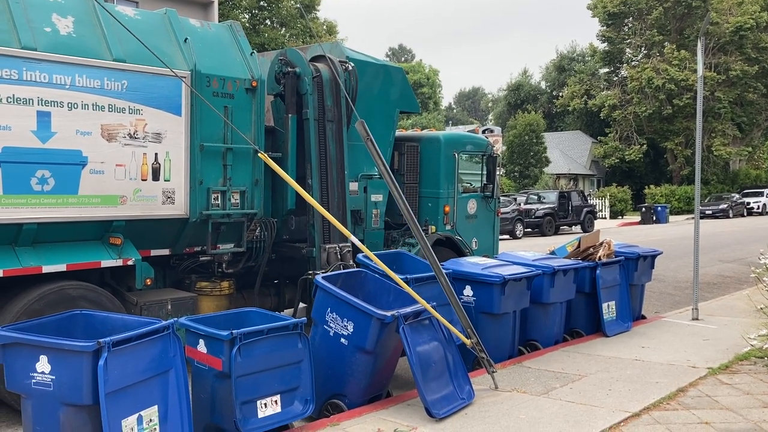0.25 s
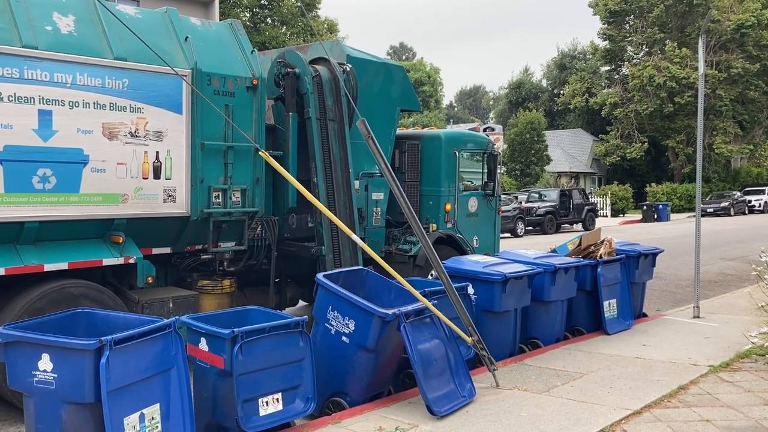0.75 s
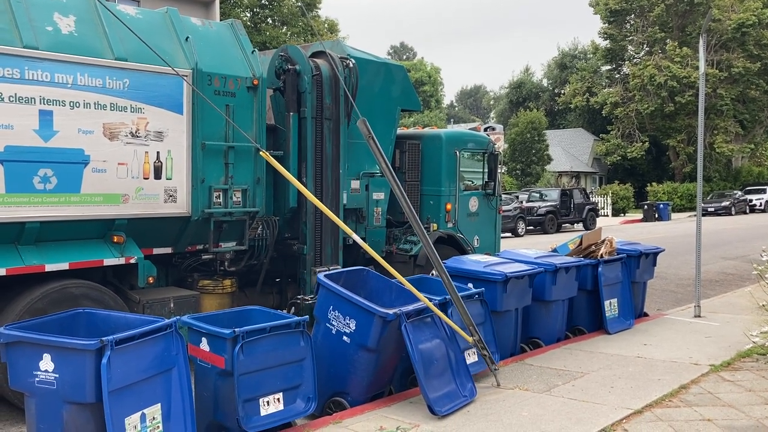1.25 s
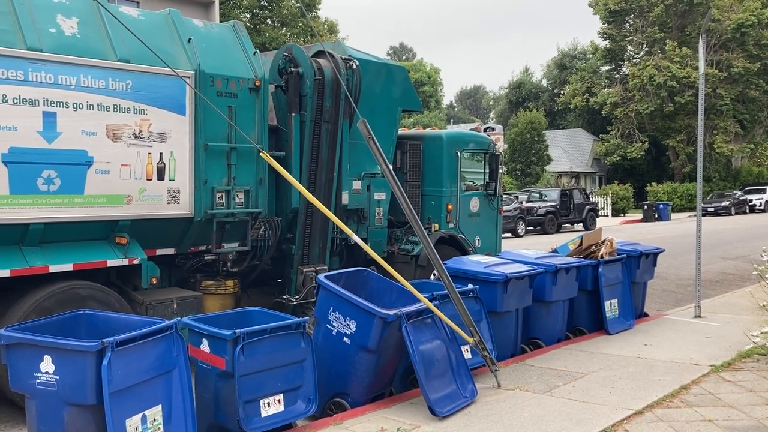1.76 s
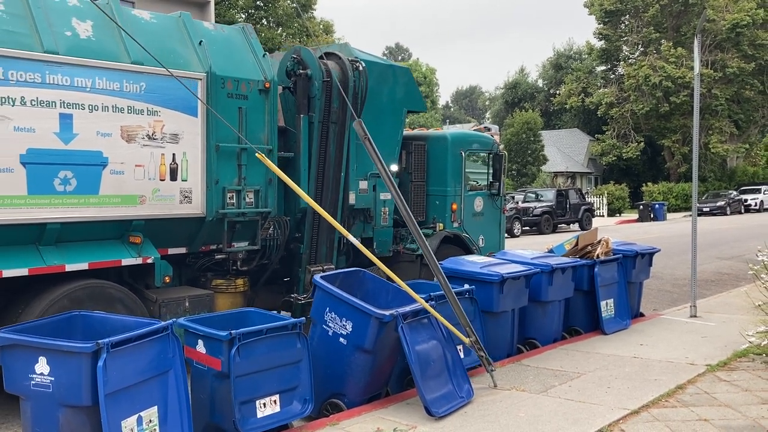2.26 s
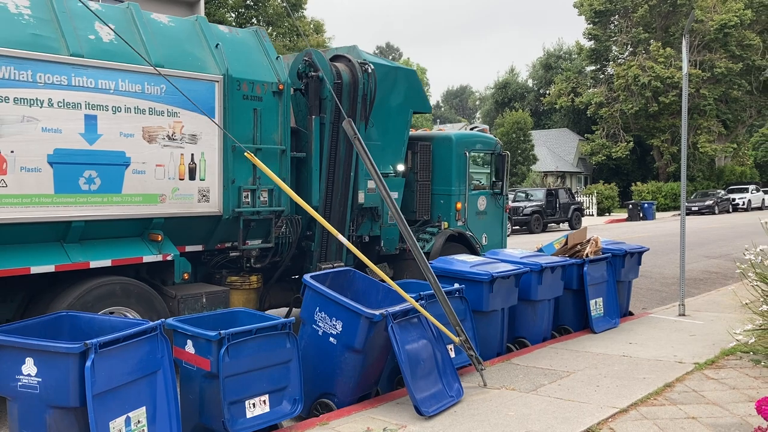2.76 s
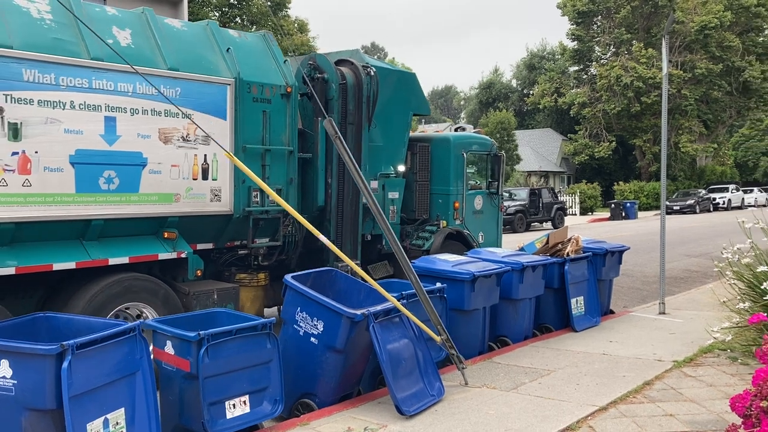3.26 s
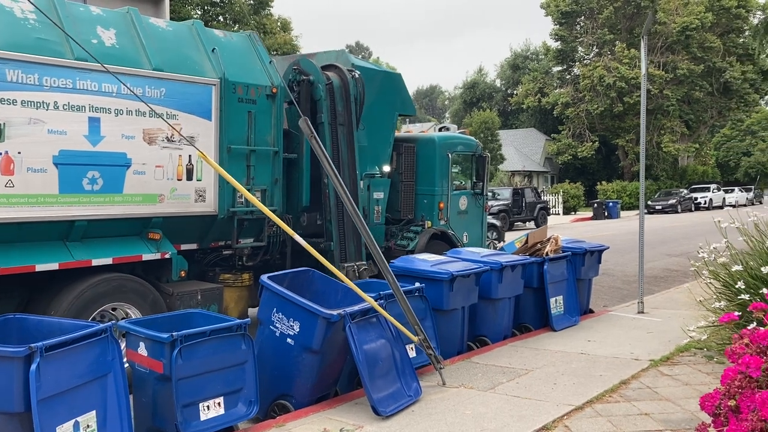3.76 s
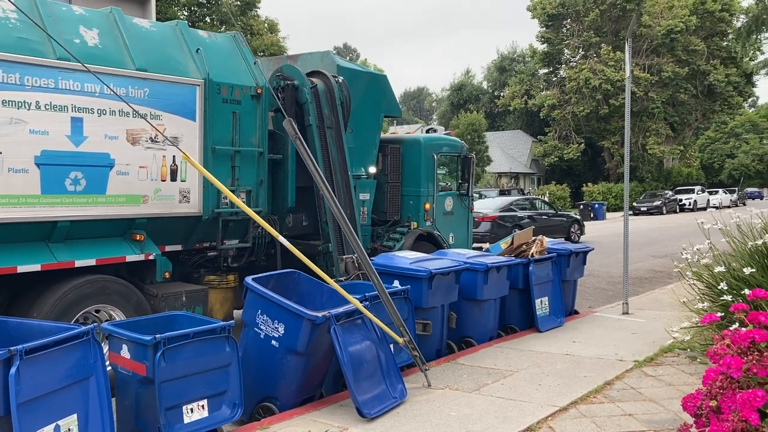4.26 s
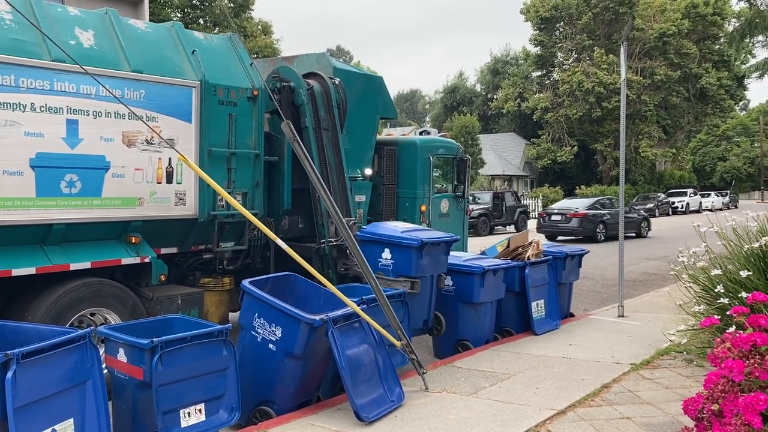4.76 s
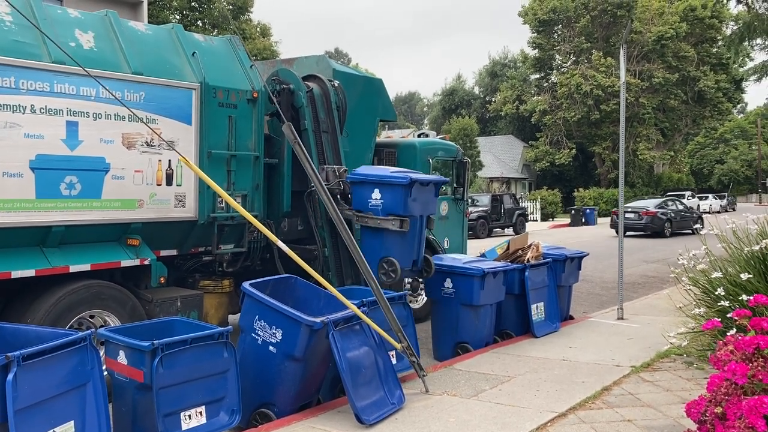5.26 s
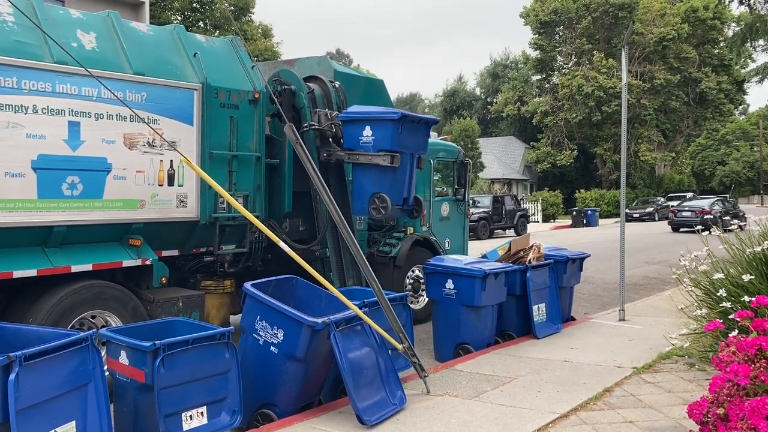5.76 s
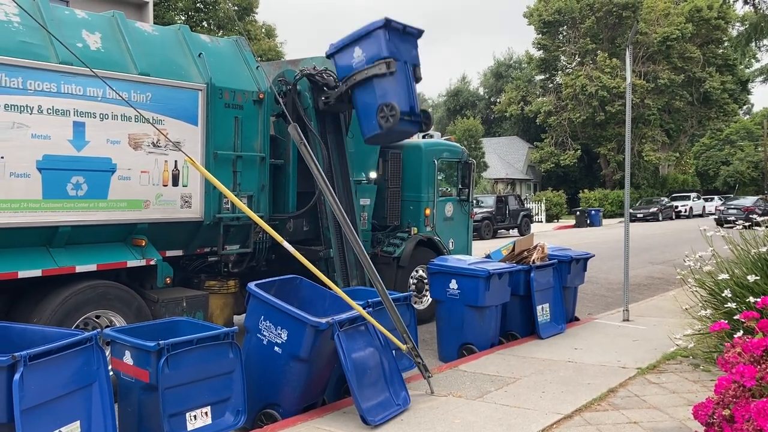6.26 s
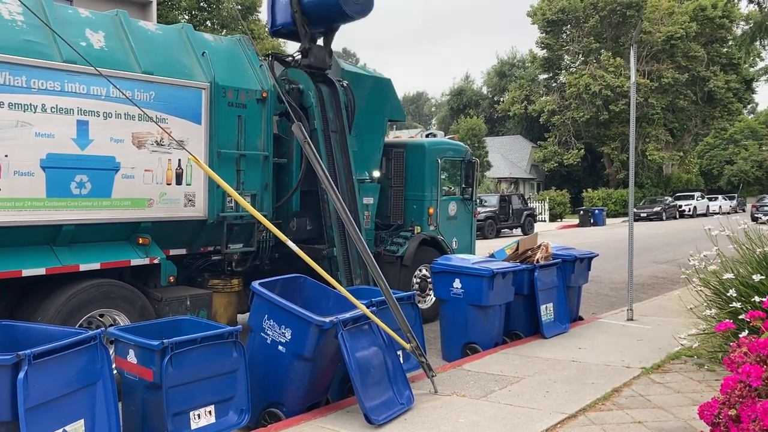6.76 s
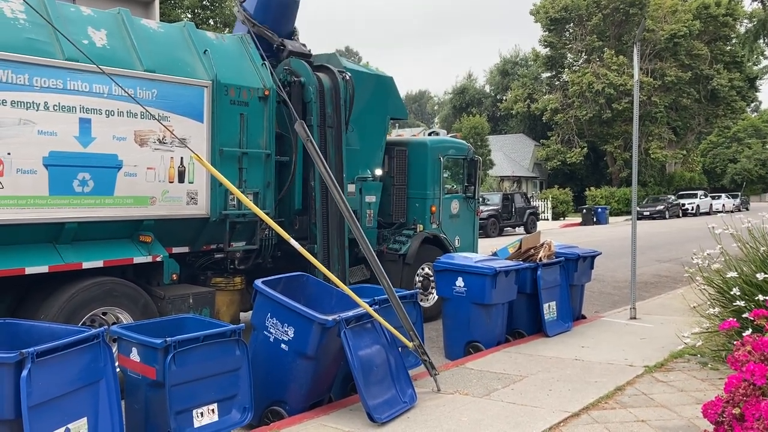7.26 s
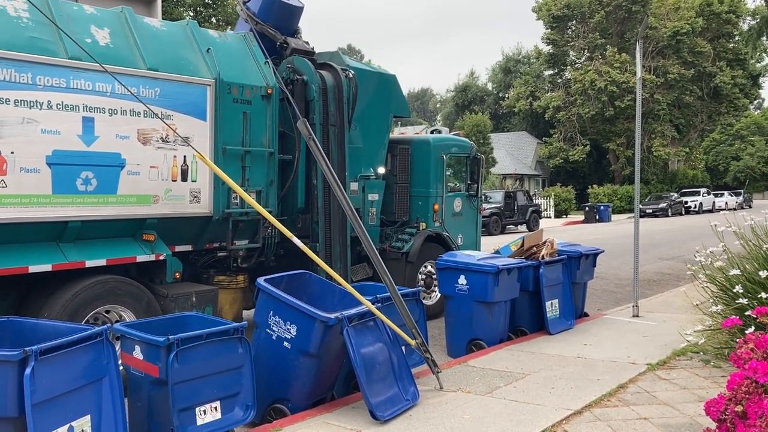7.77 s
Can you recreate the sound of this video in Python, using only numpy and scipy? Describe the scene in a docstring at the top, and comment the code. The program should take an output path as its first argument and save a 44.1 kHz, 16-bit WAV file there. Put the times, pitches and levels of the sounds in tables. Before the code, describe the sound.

A refuse truck's diesel slows to idle, then revs as its hydraulic arm lifts a plastic cart, amid clanks, thuds and brake squeals.

```python
"""At a kerb between houses, a side-loading refuse truck idles down, then revs to lift a plastic cart.
Its diesel fires in uneven puffs that boom through the exhaust; the pump whines and the turbo whistles.
Brakes squeal, air valves hiss, the steel arm clanks, hollow plastic thuds and recyclables tumble.
House fronts send back a short echo, and two microphones a little apart hear the street."""
import sys
import numpy as np
from scipy import signal
from scipy.fft import rfft, irfft, next_fast_len
from scipy.io import wavfile
from scipy.ndimage import uniform_filter1d, minimum_filter1d, map_coordinates

SR = 44100
rng = np.random.default_rng(int(sys.argv[2]) if len(sys.argv) > 2 else 0)


def file_out(sig):
    """Save sig as 16-bit WAV at sys.argv[1]."""
    # one column per channel
    cols = np.atleast_2d(sig).T
    # limit, then scale
    lim = np.clip(cols, -1, 1)
    pcm = np.round(lim * 32767).astype(np.int16)
    wavfile.write(sys.argv[1], SR, pcm)


N = 353682
T = np.arange(N) / SR

# strength of the echo against the direct sound: (frequency [Hz], level [dB])
ECHO_LEVEL = [(60, -24.5), (250, -12.5), (450, -7), (900, -0.5), (2500, -6), (6000, -5.5), (8000, -17),
              (12000, -14)]


def amp(db):
    """Turn decibels into a gain."""
    return 10 ** (np.asarray(db) / 20)


def unit(x):
    """Scale a signal to an average (rms) level of 1."""
    return x / np.sqrt(np.mean(x ** 2) + 1e-20)


def along(points, hz):
    """Read between (frequency, value) points on a log frequency axis."""
    f, v = np.transpose(points)
    return np.interp(np.log(hz + 1), np.log(f + 1), v)


def curves(rows):
    """Turn (time, values...) rows into one curve per value."""
    times, *columns = np.transpose(rows)
    return [np.interp(T, times, column) for column in columns]


def wobble(rate):
    """A smooth random curve through `rate` points a second."""
    return map_coordinates(rng.standard_normal(int(N * rate / SR) + 4), [T * rate])


def decay(t, fade):
    """Die away by 60 dB in `fade` seconds, as all fade times here do."""
    return amp(-60 * t / fade)


def burst(start, rise, hold, fade):
    """A loudness shape that rises to 1, holds and dies away."""
    return decay(np.clip(T - start - rise - hold, 0, None), fade) * np.clip((T - start) / rise, 0, 1)


def filtered(x, response):
    """Filter x with a gain that depends on frequency."""
    size = next_fast_len(N + SR // 2)
    return irfft(rfft(x, size) * response(np.fft.rfftfreq(size, 1 / SR)), size)[..., :N]


def coloured(x, spectrum):
    """Shape x by (frequency [Hz], level [dB]) points, then scale it to level 1."""
    return unit(filtered(x, lambda hz: amp(along(spectrum, hz))))


def noise(spectrum):
    """Steady noise with the given spectrum."""
    return coloured(rng.standard_normal(N), spectrum)


def tone(hz, drift_hz, flutter_db):
    """A tone of level 1 whose pitch and strength waver."""
    drift = drift_hz * wobble(900)
    return unit(amp(flutter_db * wobble(40)) * np.sin(2 * np.pi * np.cumsum(hz + drift) / SR))


def ticks(hz):
    """The samples at which each cycle of a rate ends."""
    return np.flatnonzero(np.diff(np.floor(np.cumsum(hz) / SR)))


def swells(rows, waver_share, waver_db, rate):
    """Tones that swell and fade, wavering in pitch and strength."""
    out = np.zeros(N)
    pitch, strength = wobble(rate), wobble(rate)
    for start, length, hz, db in rows:
        span = slice(round(start * SR), round((start + length) * SR))
        swell = np.abs(np.sin(np.pi * np.linspace(0, 1, len(T[span])))) ** 0.29
        phase = 2 * np.pi * hz * np.cumsum(1 + waver_share * pitch[span]) / SR
        out[span] += np.sqrt(2) * amp(db + waver_db * strength[span]) * swell * np.sin(phase)
    return out


def mode(t, hz, db, fade, scatter_db, detune):
    """One ringing note (mode) of a struck thing, a little different each time."""
    strength = amp(db + rng.normal(0, scatter_db))
    return strength * decay(t, fade) * np.sin(2 * np.pi * hz * rng.normal(1, detune) * t)


def favoured(hz, near_hz):
    """The spot that is struck lifts the modes close to near_hz by up to 9 dB."""
    return 9 * np.exp(-(np.log2(hz / near_hz) / .3) ** 2)


def street_echo(x, count=4):
    """House fronts return a short tail, different at each microphone and changing as the air moves."""
    # how long the echo lasts: (frequency [Hz], fade time [s])
    fades = [(100, 0.71), (1000, 0.28), (5000, 0.19), (12000, 0.098)]
    hz, t, bands = signal.stft(rng.standard_normal((count, 2, SR // 3)), SR, nperseg=256)
    bands = bands * decay(t, along(fades, hz)[:, None])
    tails = signal.istft(bands / np.linalg.norm(bands, axis=-1, keepdims=True), SR, nperseg=256)[1]
    tails /= np.linalg.norm(tails, axis=-1, keepdims=True)
    delayed = np.pad(tails, ((0, 0), (0, 0), (200, 0)))
    step = (T / .12 - np.arange(count)[:, None]) % count
    parts = x * np.where(step < 2, np.sin(np.pi * step / 2), 0)  # the tails take turns, overlapping
    echo = signal.fftconvolve(parts[:, None], delayed, axes=2).sum(0)[:, :N]
    return filtered(echo, lambda f: amp(along(ECHO_LEVEL, f)))


def turbocharger():
    """Spinning blades whistle, fuzzier as they go faster."""
    # the blades' note: (time [s], pitch [Hz], level [dB])
    blades = [(0, 11500, -36), (.1, 11250, -45), (.3, 10570, -38.5), (.5, 10050, -40), (.7, 9700, -32.5),
              (.9, 8550, -50), (1.4, 7870, -54.5), (2.8, 7420, -52), (4.4, 6987, -57), (4.7, 7530, -50),
              (4.82, 8110, -37), (4.92, 8700, -46), (5.1, 9284, -41), (5.5, 10120, -36), (6, 10680, -36),
              (6.5, 11020, -37.5), (7.3, 10850, -44), (8.02, 11250, -38.5)]
    hz, db = curves(blades)
    whistle = tone(hz, drift_hz=110 + 0.022 * (hz - 6500), flutter_db=2.5)
    return amp(db) * whistle * amp(2.5 * wobble(200) - 2)


def thin_whistle():
    """A thin whistle is heard while the engine works hard."""
    # its course: (time [s], pitch [Hz], level [dB])
    course = [(0, 7330, -60), (.2, 6930, -47), (.5, 6380, -45), (.65, 6150, -72), (5.3, 6361, -77),
              (5.6, 6547, -58), (6.2, 6900, -53), (6.45, 7074, -41), (6.9, 7000, -45), (7.2, 7053, -50),
              (7.5, 7020, -57), (7.7, 7016, -47), (8.02, 7080, -46)]
    hz, db = curves(course)
    return amp(db) * tone(hz, drift_hz=22, flutter_db=2)


def short_squeals():
    """Brakes and joints give brief, clear squeals."""
    # squeals: (start [s], length [s], pitch [Hz], level [dB])
    squeals = [(3.07, .13, 14800, -50), (3.23, 0.13, 9220, -30), (3.22, .074, 15500, -46),
               (3.385, 0.077, 7070, -29.5), (3.46, 0.11, 7080, -49), (3.878, 0.025, 4490, -42),
               (5.655, 0.044, 6610, -43)]
    return swells(squeals, waver_share=.002, waver_db=2.8, rate=60)


def hydraulics():
    """The hydraulic arm and the packer hum."""
    # hums: (start [s], length [s], pitch [Hz], level [dB])
    hums = [(.9, 0.31, 355, -31), (1.75, 0.54, 271, -31.5), (4.45, 0.71, 205.5, -28.5),
            (4.8, 0.32, 314.3, -33.5), (6, 1.2, 231.5, -28), (6, 0.89, 460.7, -36), (7.3, 0.18, 366, -29.5),
            (7.7, 0.34, 243, -38)]
    return swells(hums, waver_share=.02, waver_db=5, rate=28)


def breathy_tones():
    """Breathy high squeaks, and the pump whine's fuzzy octave at idle; fast wavering blurs both."""
    # squeaks, and the octave near 2400 Hz: (start [s], length [s], pitch [Hz], level [dB])
    notes = [(1.0, 0.062, 11050, -29), (2.85, 0.099, 2387, -48), (3.128, 0.032, 11050, -32.5),
             (3.158, 0.041, 11060, -43), (3.62, 0.21, 2375, -49), (4.24, .22, 2445, -43),
             (5.893, 0.022, 11750, -26), (5.915, 0.062, 11900, -42)]
    return swells(notes, waver_share=.012, waver_db=4, rate=700)


def lift_chain(links_hz=51):
    """Chain links tick over their toothed wheel while the arm lifts."""
    lift = amp(-41.5 + 3.52 * wobble(4.87)) * burst(start=4.545, rise=0.24, hold=1.107, fade=0.43)
    at, links = ticks(links_hz * (1 + .22 * wobble(30))), np.zeros(N)
    links[at] = amp(3 * rng.standard_normal(len(at)))
    rattle = signal.fftconvolve(links, decay(T[:SR // 20], 0.026))[:N] * rng.standard_normal(N)
    return lift * coloured(rattle, [(3000, -9), (8000, -6), (13000, -1), (15800, -12)])


def air_valves():
    """Valves let out air in hissing jets."""
    # jets: (start [s], rise [s], hold [s], fade time [s], level [dB])
    vents = [(0.938, 0.056, 0.068, 0.54, -26.5), (3.303, 0.045, 0.071, 0.15, -30.5)]
    # colour of the hiss: (frequency [Hz], level [dB])
    hiss = [(3000, -9), (5000, -13), (7000, -20), (9000, -13), (11000, -5), (13000, -13), (14500, -15)]
    jets = sum(amp(db) * burst(start, rise, hold, fade) for start, rise, hold, fade, db in vents)
    return jets * noise([(1500, -20), *hiss])


def brake():
    """One brake shoe sings on its drum, swelling three times."""
    # the long squeal: (time [s], pitch [Hz], level [dB])
    squeal = [(3.165, 5770, -65), (3.185, 5770, -31), (3.215, 5770, -32), (3.24, 5800, -46),
              (3.34, 5820, -44), (3.414, 5830, -29), (3.448, 5810, -35), (3.5, 5800, -29),
              (3.53, 5800, -42), (3.59, 5800, -49), (3.65, 5800, -75)]
    hz, db = curves(squeal)
    return amp(db) * tone(hz, drift_hz=12, flutter_db=1.2)


def pile(rate, spread_db, fade, spectrum):
    """Small hits of uneven size at random times, about `rate` a second."""
    hits = (rng.random(N) < rate / SR) * amp(spread_db * np.clip(rng.standard_normal(N), -3, 1.6))
    lumps = signal.fftconvolve(hits, decay(T[:SR // 5], fade))[:N]
    return coloured(lumps * rng.standard_normal(N), spectrum)


def tumbling():
    """Recyclables tumble: cardboard and plastic sound dull, cans and glass bright."""
    # slides and cart scrapes: (start [s], rise [s], fade time [s], dull level [dB], bright level [dB])
    slides = [(0.472, 0.012, 0.73, -18, -33), (.707, 0.02, 0.94, -17, -29), (1.1, 0.085, 0.3, -26.5, -35.5),
              (1.34, 0.013, 4.5, -26, -36.5), (1.51, 0.035, 0.46, -35, -27),
              (1.545, 0.048, 0.56, -17.5, -18.5), (1.7, 0.19, 1.3, -26, -39),
              (2.03, 0.057, 0.74, -34, -40.5), (2.929, 0.033, 1.36, -28, -31.5),
              (3.2, 0.015, 0.16, -38, -42), (3.42, 0.092, 0.27, -27, -43), (3.65, 0.22, 1.4, -27, -34),
              (4.206, 0.0092, 0.24, -27, -21), (4.317, 0.02, 0.69, -27, -38),
              (6.508, 0.011, 2.1, -21.5, -32.5), (6.93, 0.035, 1.2, -29, -28.5),
              (7.04, 0.091, 0.25, -21, -29), (7.28, 0.02, 1.4, -22, -32.5)]
    dull = pile(rate=220, spread_db=4, fade=0.078, spectrum=[
        (120, 1), (300, 8), (450, 1.5), (640, 5), (860, -7.5), (1250, -2), (3000, -44)])
    bright = pile(rate=170, spread_db=2.5, fade=0.21, spectrum=[
        (700, -12.5), (1600, 0), (2600, 1), (4500, -5.5), (8000, -11.5), (15800, -18.5)])
    return sum(burst(start, rise, 0, fade) * (amp(dull_db) * dull + amp(bright_db) * bright)
               for start, rise, fade, dull_db, bright_db in slides)


def steel_clanks(dull):
    """Struck steel rings briefly under a spray of dull and bright noise."""
    # blows: (time [s], level [dB], treble [dB], favoured pitch [Hz])
    clanks = [(0.528, -25, -23, 2300), (0.7549, -15, -2, 2600), (0.99, -24.5, -14, 1418),
              (1.352, -34, -25, 1597), (1.409, -27, -21, 1920), (1.537, -15, -1.5, 3750),
              (1.737, -24.5, 1, 3750), (1.7493, -19, 0, 2282), (1.922, -21, -12, 1250),
              (1.94, -21.5, -13, 2000), (1.99, -26, -6.5, 3400), (2.947, -23, -10, 2247),
              (2.951, -26, -20, 1538), (2.9858, -19.5, -10, 1880), (3.067, -25, -18, 2250),
              (3.12, -26, -13, 1404), (3.242, -25, -30, 1598), (3.252, -25, -25, 1800),
              (3.4887, -34, -23, 1090), (3.5328, -34, -25, 1800), (3.691, -31.5, -9, 2320),
              (3.8634, -26, -22, 1710), (3.885, -28, -17, 2400), (3.9523, -30, -15, 2450),
              (4.0901, -35, -1, 2278), (4.2144, -14.5, -5.5, 5090), (4.33, -32, -24, 1189),
              (5.899, -22, -14, 5100), (6.5132, -27, -15, 2305), (6.6607, -22.5, -2.5, 4510),
              (6.9602, -21, 0, 1924), (7.003, -15, -3, 1854), (7.0402, -19, -22, 2297),
              (7.091, -23.5, -7, 2302), (7.283, -22.5, -9, 2500), (7.4537, -19, -6, 4206),
              (7.5453, -27, -4, 4814)]
    # the steel's modes: (pitch [Hz], level [dB], fade time [s])
    steel = [(760, -6, .08), (1180, -6, .07), (1560, -3, .05), (1880, -3, .045), (2250, -2, .05),
             (2860, -6, .06), (3400, -5, .05), (3750, -6, .05), (4500, -11, .04), (5100, -13, .035)]
    out, t = np.zeros(N + SR), T[:SR // 5]
    bright = noise([(4000, 6.5), (7000, 0), (11000, -0.5), (15800, -45)])
    crack = decay(t, .08) + .15 * decay(t, .3)  # a sharp crack, then loose parts settle
    for start, db, treble_db, near_hz in clanks:
        i = round(start * SR)
        tilt_db = 0.13 * treble_db  # duller blows start more softly and ring less in their high modes
        ring = sum(mode(t, hz, level + favoured(hz, near_hz) + tilt_db * np.log2(hz / 1560), fade,
                        scatter_db=2.5, detune=.025) for hz, level, fade in steel)
        spray = amp(tilt_db) * dull[i:][:len(t)] + amp(treble_db + 5) * bright[i:][:len(t)]
        attack = 1 - np.exp(-t * amp(tilt_db) / .0029)
        out[i:][:len(t)] += amp(db) * attack * (.65 * ring + 1.33 * spray * crack)
    return out[:N]


def cart_knocks(dull):
    """A hard knock makes the cart's plastic shell ring, with a slap of dull noise."""
    # knocks: (time [s], level [dB], fade time factor, favoured pitch [Hz])
    knocks = [(0.4754, -13.5, 0.76, 800), (.493, -19.5, 0.73, 415), (.528, -25, .7, 830),
              (0.7084, -19, 1.2, 415), (.719, -15.5, 0.84, 800), (1.565, -16, .8, 650),
              (1.609, -19, 0.7, 650), (1.632, -20, 0.55, 650), (1.846, -21.5, 0.75, 413),
              (2.085, -27, 0.59, 1000), (3.695, -25.5, 0.77, 1000), (3.834, -27, .7, 503),
              (3.878, -21, .7, 620), (3.957, -19.5, .8, 1000), (4.331, -25.5, .8, 620),
              (4.352, -27, .8, 510), (6.672, -19.5, .8, 620), (6.942, -28, 0.59, 1766),
              (7.045, -19, 0.79, 1300), (7.11, -18, .7, 620), (7.1425, -4.5, .15, 1200),
              (7.29, -20, 0.72, 1300), (7.513, -21, .6, 501)]
    # the shell's modes: (pitch [Hz], level [dB], free fade time [s])
    shell = [(415, 0, .09), (520, -5, .07), (650, -3, .07), (830, -3, .07), (1000, -6, .06),
             (1360, -5, .06), (1770, -6, .05), (2000, -8, .04), (2450, -9, .05)]
    out, t = np.zeros(N + SR), T[:SR // 5]
    attack = 1 - np.exp(-t / .0008)
    for start, db, lasting, near_hz in knocks:
        i = round(start * SR)
        ring = sum(mode(t, hz, level + favoured(hz, near_hz), fade * lasting,
                        scatter_db=1.1, detune=0.039) for hz, level, fade in shell)
        slap = 0.65 * decay(t, 0.019) * dull[i:][:len(t)]
        out[i:][:len(t)] += amp(db) * attack * (ring + slap)
    return out[:N]


def hollow_thuds(ring_cycles=39):
    """Hollow carts and the truck's hopper boom in a few low modes; the higher ones die sooner."""
    # thuds: (time [s], level [dB], lowest pitch [Hz])
    thuds = [(.474, -6, 232), (.529, -7.5, 120.5), (.709, -0.5, 148.6), (0.721, -3, 86.4),
             (.776, -11, 106.4), (0.821, -13.5, 90.9), (.875, -8.5, 245), (.915, -5, 127),
             (0.962, -14, 93.6), (1.544, -5, 178.8), (1.568, -8, 98.4), (1.62, -17, 285),
             (1.85, -19, 154.4), (2.959, -8, 248), (3.496, -18, 213.4), (3.715, -10.5, 140.4),
             (3.832, -8, 126.3), (3.88, -13.5, 220.6), (4.088, -10.5, 148.3), (4.218, -17.5, 254.2),
             (6.512, -14, 216), (6.94, -9.5, 239.7), (7.035, -11, 111.3), (7.146, 4.5, 270.8)]
    # the hollow body's modes: (multiple of the lowest pitch, level [dB])
    hollow = [(1, 0), (1.23, -6), (1.8, -8), (2.6, -13), (3.4, -14), (5.2, -18)]
    out, t = np.zeros(N + SR), T[:SR // 3]
    attack = 1 - np.exp(-t / 0.0037)
    for start, db, hz in thuds:
        boom = sum(mode(t, hz * k, level, ring_cycles / (hz * k ** 0.5), scatter_db=0.9, detune=0.018)
                   for k, level in hollow)
        out[round(start * SR):][:len(t)] += amp(db) * attack * np.sqrt(.5) * boom
    return out[:N]


def pump(firing_hz, idling):
    """The pump's gear teeth whine in step with the engine, blurred at idle."""
    # the whine, louder under pressure: (time [s], level [dB])
    whine = [(0, -49), (.3, -45), (.44, -40), (.7, -58), (2.15, -60), (2.35, -49), (2.9, -49), (3.1, -54),
             (3.95, -54), (4.15, -49), (4.45, -56), (4.6, -47), (4.7, -52), (4.8, -40), (4.98, -41),
             (5.07, -46), (5.17, -41), (5.28, -50), (5.42, -39), (5.78, -39), (5.86, -44), (6.03, -36),
             (6.11, -47), (6.27, -38), (6.5, -45), (6.68, -38), (6.9, -38), (7.1, -41), (7.5, -42),
             (7.75, -42), (7.86, -53), (8.02, -40)]
    return amp(curves(whine)[0]) * tone(32.3 * firing_hz, drift_hz=7 + 18 * idling, flutter_db=2.2)


def exhaust_puffs(firing_hz):
    """Each firing sends a puff that echoes along the exhaust pipe."""
    # the six uneven cylinders: (level [dB])
    cylinders = [0, -5, -2.5, -1, -9, -1]
    at, puffs = ticks(firing_hz), np.zeros(N)
    puffs[at] = amp(np.resize(cylinders, len(at)) + 0.37 * rng.standard_normal(len(at)))
    puffs[at] -= 0.86 * puffs[at].mean()  # the silencer cancels most of what all cylinders share
    pipe_echo = decay(T[:SR // 5], 0.21) * rng.standard_normal(SR // 5)
    return unit(signal.fftconvolve(puffs / np.sqrt(firing_hz), pipe_echo)[:N])


def diesel(firing_hz, load_db, idling):
    """The firings make deep tones, pulsing noise and hiss. Returns (tones, noise)."""
    # how the pipe boosts the deep tones: (frequency [Hz], gain [dB])
    pipe = [(30, -32), (38, -18.5), (46, -12.5), (60, -1), (70, 1), (80, -14), (92, -20), (125, -46)]
    # colours of the exhaust, engine body, hiss and topmost sizzle: (frequency [Hz], level [dB])
    exhaust_colour = [(25, -57), (45, -2.5), (85, -1), (150, -5.5), (215, -4.5), (330, -12), (600, -66),
                      (1200, -55)]
    body_colour = [(100, -3), (300, 0), (600, 0), (1000, -5.5), (1600, -8.5), (2500, -11.5), (4000, -15),
                   (6500, -22.5), (9000, -60)]
    hiss_colour = [(3000, -10), (6000, -2), (8500, 0), (11000, -4), (12500, -18), (15800, -36)]
    sizzle_colour = [(9500, -7.5), (12000, -3.5), (13500, -13), (15800, -14)]

    def gain(db, per_hz, per_load, waver_db, rate):
        """A wavering gain that grows with speed and load; db holds at 60 Hz and a load of -14 dB."""
        return amp(db + per_hz * (firing_hz - 60) + per_load * (load_db + 14) + waver_db * wobble(rate))

    phase = 2 * np.pi * np.cumsum(firing_hz) / SR
    surge = idling * np.sin(phase / 3)  # at idle the engine surges once a crank turn
    boom = amp(load_db + along(pipe, firing_hz) + 0.21 * wobble(17)) * np.sin(phase)
    octave = amp(load_db + along(pipe, 2 * firing_hz) + 1.54 * wobble(10)) * np.sin(2 * phase)
    cab_drone = gain(-33.5, 0.058, 0.67, waver_db=2.5, rate=8.2) * np.sin(3.5 * phase)
    tones = np.sqrt(2) * (boom + (1 + .5 * surge) * octave + cab_drone)
    roar = (0.8 * exhaust_puffs(firing_hz) + 0.6 * rng.standard_normal(N)) * (1 + 0.29 * surge)
    exhaust = gain(-24.5, 0.0092, 0.28, waver_db=2.2, rate=6.4) * coloured(roar, exhaust_colour)
    knock = 1 + 0.14 * np.sin(phase)
    body = gain(-29, 0.083, 0.45, waver_db=0.18, rate=12)
    body *= coloured(knock * rng.standard_normal(N), body_colour)
    hiss = gain(-43, 0.13, 0.74, waver_db=0.33, rate=12) * noise(hiss_colour)
    sizzle = gain(-39.5, 0.22, 0.47, waver_db=0.86, rate=13) * noise(sizzle_colour)
    return tones, exhaust + body + hiss + sizzle


def scene():
    """Engine tones, the pump's main whine and the long brake squeal come straight; the rest echoes too."""
    # how the engine is driven: (time [s], firing rate [Hz], load [dB])
    engine = [(0.0, 61.3, -14), (0.3, 54.9, -23.5), (0.65, 45.25, -13), (1.1, 29.75, -21.5),
              (1.35, 32, -14.5), (1.6, 31.72, -22), (1.8, 32.75, -19.5), (1.95, 43.1, -19),
              (2.2, 38.95, -22), (2.5, 37.45, -28), (3.2, 34.82, -23.5), (3.8, 36.05, -22), (4.0, 39, -14),
              (4.3, 37.05, -21.5), (4.5, 39.5, -14), (4.62, 46.49, -10.5), (4.75, 52.72, -13),
              (4.9, 58.15, -12.5), (5.1, 60.8, -12.5), (5.5, 60.7, -13), (6.06, 60.18, -12.5),
              (6.14, 59, -14.5), (6.3, 58.15, -12.5), (6.8, 59.9, -11.5), (7.53, 60.46, -13.5),
              (7.8, 62.14, -13), (8.02, 63.4, -18.5)]
    firing_hz, load_db = curves(engine)
    # 1 at idle; 0 when revved or dragged slower
    idling = np.clip((45 - firing_hz) / 7, 0, 1) * np.clip((firing_hz - 33.5) / 4, 0, 1)
    tones, truck = diesel(firing_hz, load_db, idling)
    tones += pump(firing_hz, idling)
    truck += turbocharger() + thin_whistle() + short_squeals() + hydraulics() + breathy_tones()
    truck += lift_chain() + air_valves()
    dull = noise([(300, 1.5), (900, -1), (2200, 3), (4500, -1.5), (8000, -18.5)])
    truck += steel_clanks(dull) + cart_knocks(dull) + hollow_thuds() + tumbling()
    tones += brake()
    same_power = lambda hz: 1 / np.sqrt(1 + amp(2 * along(ECHO_LEVEL, hz)))  # the echo adds no loudness
    return tones + filtered(truck + street_echo(truck), same_power)


def gain_control(x, top, hold_s, glide_s):
    """Peaks over `top` turn the volume down a little; it holds, then glides back."""
    need = np.minimum(1, top / (np.abs(x).max(0) + 1e-9)) ** 0.065
    hold, glide = int(hold_s * SR), int(glide_s * SR)
    held = minimum_filter1d(need, hold + glide, origin=(hold - glide) // 2)
    return x * uniform_filter1d(held, glide)


def record(dry):
    """Two microphones differ in level and phase; bangs are tamed, the lowest and highest sounds cut."""
    # how much louder the left side is: (frequency [Hz], level [dB])
    left_louder = [(60, -.6), (400, -0.8), (850, 3), (1500, 5), (2600, 2.5), (3600, 1.5), (4500, 0.3),
                   (15000, 0)]
    # how far the left side's wave is ahead: (frequency [Hz], phase [radians])
    left_ahead = [(100, 0), (700, 1.2), (1000, 0), (2000, .2), (3200, 2), (3700, .5), (5600, 2.4),
                  (7000, 0), (9250, -3.14), (11400, -6.28), (13600, -9.42), (15600, -12.57)]
    bass_hz, top_hz = 32, 15900
    lead_hz, lead = np.transpose(left_ahead)
    left = lambda hz: amp(along(left_louder, hz) / 2) * np.exp(.5j * np.interp(hz, lead_hz, lead))
    stereo = filtered(dry, lambda hz: np.array([left(hz), 1 / left(hz)]))
    stereo = gain_control(stereo, top=1.0, hold_s=0.083, glide_s=0.024)
    stereo = stereo / (1 + np.abs(stereo / .98) ** 6) ** (1 / 6)  # round off the peaks
    return filtered(stereo, lambda hz: (hz < top_hz) / np.sqrt(1 + (bass_hz / (hz + 1)) ** 8))


dry = scene()
out = record(dry)
file_out(out)
```